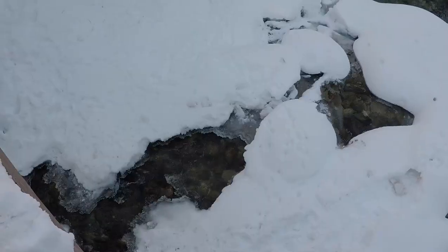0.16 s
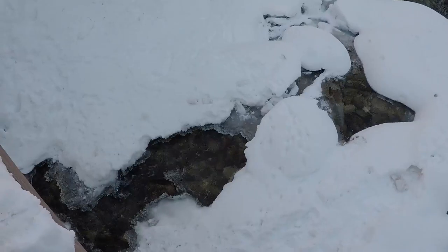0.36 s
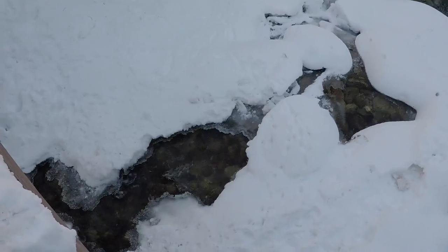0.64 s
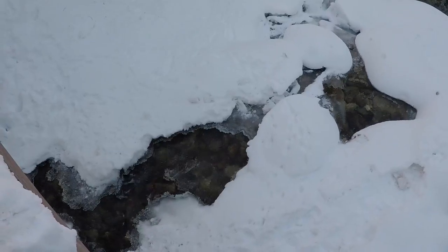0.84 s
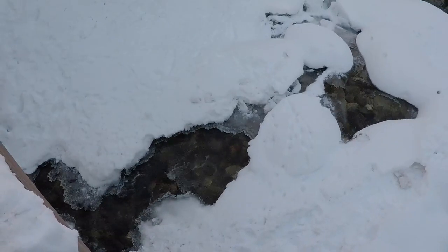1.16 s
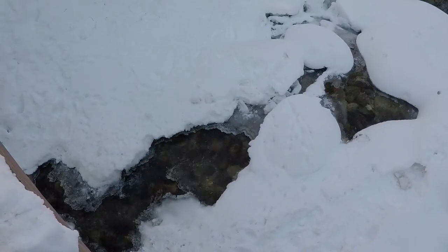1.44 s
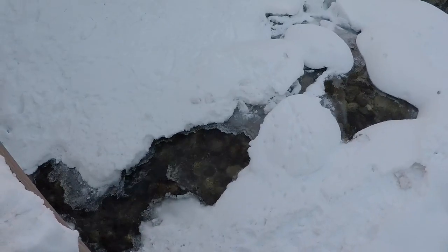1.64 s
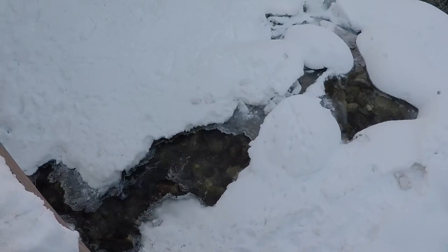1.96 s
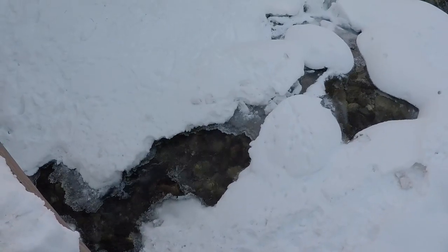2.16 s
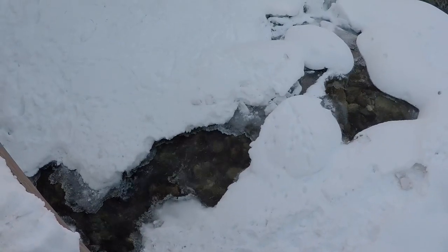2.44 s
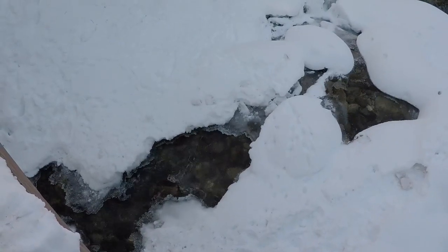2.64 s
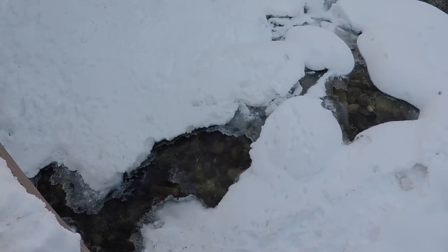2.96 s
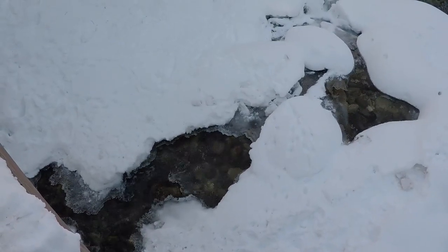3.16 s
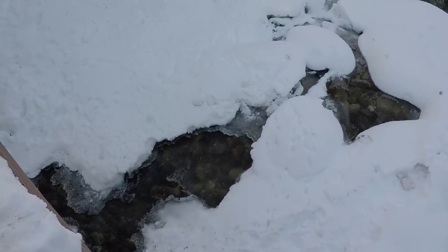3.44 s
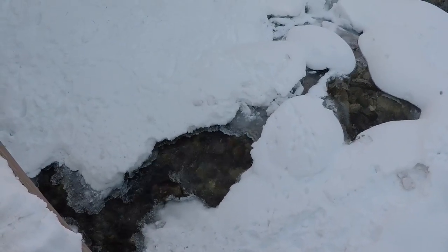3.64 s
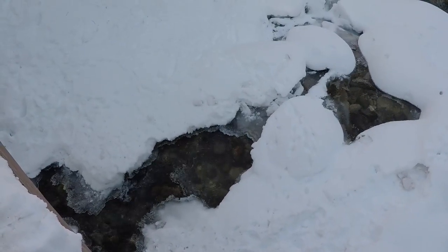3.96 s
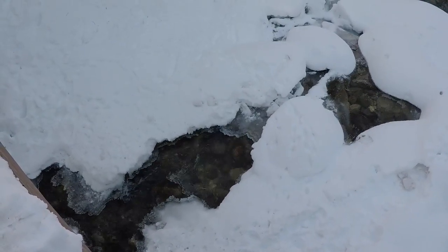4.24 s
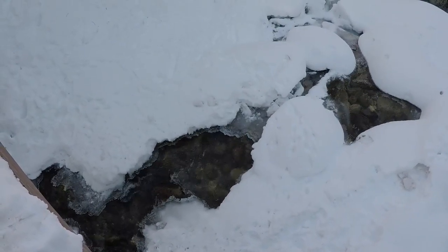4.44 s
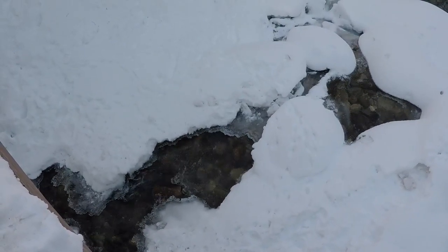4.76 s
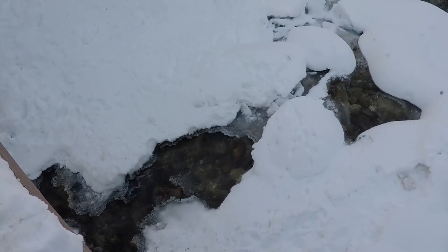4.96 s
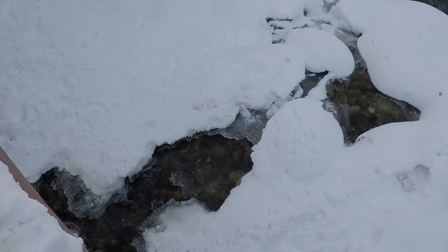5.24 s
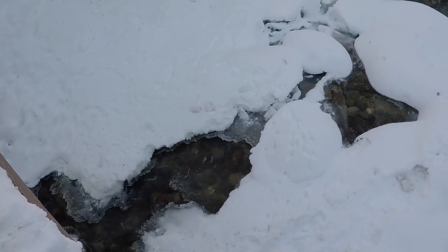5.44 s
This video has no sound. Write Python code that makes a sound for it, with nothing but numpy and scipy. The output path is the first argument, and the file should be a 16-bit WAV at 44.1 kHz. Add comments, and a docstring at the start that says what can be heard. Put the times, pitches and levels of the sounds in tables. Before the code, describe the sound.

Outdoors in snow, a small stream runs steadily past a nearby microphone: soft low rush, hollow gurgling, light babble and fine spray. Bright drops and tiny spits come irregularly, with deeper glugs just before four seconds and after five. A distant engine hums low throughout, sagging slightly in pitch, with faint wind rumble. Around five seconds something brushes briefly like a sleeve.

```python
"""The listener hears first the soft rush of a small river over rocks, between banks of snow and ice.
Over this patchy noise, damped sines make big air pockets gurgle and small bubbles babble; noise bursts spit.
In the distance an engine, a sum of harmonics, hums and slowly sags in speed; a draught rumbles and puffs.
Near the end something brushes briefly, like a sleeve: gritty high noise under a short envelope."""
import sys
import numpy as np
from scipy import signal
from scipy.fft import rfft, irfft, next_fast_len
from scipy.io import wavfile
from scipy.ndimage import uniform_filter1d, map_coordinates

SR = 44100
rng = np.random.default_rng(int(sys.argv[2]) if len(sys.argv) > 2 else 0)


def generate_wav(signal):
    """Clip the signal to [-1, 1] and save it as 16-bit WAV at the path in sys.argv[1]."""
    frames = np.transpose(np.atleast_2d(signal))
    scaled = np.clip(frames, -1, 1) * 32767
    pcm = np.round(scaled).astype(np.int16)
    wavfile.write(sys.argv[1], SR, pcm)


N = 247401  # length [samples]

# Air rumble spectrum: (frequency [Hz], relative density [dB])
RUMBLE_SPECTRUM = [(10, -36), (22, -4), (42, 5), (65, 7), (110, -13), (250, -50)]
# Puffs of air on the microphone: (time [s], level [dB])
AIR_PUFFS = [(.29, -46), (1.37, -49), (2.56, -50), (3.14, -48), (3.46, -49)]
# Swelling of the engine hum: (time [s], first order level before trim [dB], second order level [dB])
HUM_LEVELS = [(0.1, -40.0, -41), (0.4, -44.5, -39.5), (1.3, -39.5, -39.5), (1.52, -46.5, -41.0),
              (1.87, -35.5, -41.0), (2.3, -45.5, -41.5), (2.6, -42, -45.5), (2.9, -43.0, -41.5),
              (3.2, -50.5, -42), (3.9, -42, -43), (4.33, -52, -46.0), (4.6, -43.5, -43.5),
              (5.0, -48, -48.0), (5.25, -44, -42.5), (5.6, -48, -41)]
# Engine overtones: (multiple of the firing rate [1], level against the second order before edge [dB])
HUM_OVERTONES = [(3, -7), (4, -13), (5, -16.5), (6, -24)]
# Cloth noise spectrum: (frequency [Hz], relative density [dB])
CLOTH_SPECTRUM = [(1200, -40), (2200, -10), (3000, 2), (4000, -2.5), (4900, 2.5), (5900, -9), (6500, -3),
                  (7700, -13), (10000, -9), (11400, -9), (12300, -12), (15000, -12.5)]
# Spectra of the soft rush, deep gurgle, babble and spray: (frequency [Hz], relative density [dB])
RUSH_SPECTRUM = [(40, -18), (100, 2), (200, -2), (300, -1.5), (450, 0.5), (600, -7.5), (750, -11),
                 (900, -16.5), (1250, -17.5), (1650, -24.5), (3000, -23.5), (6000, -35.5), (10000, -43),
                 (15000, -44.5)]
GURGLE_SPECTRUM = [(130, -4.5), (200, -3), (250, -5), (290, 1.5), (360, -3), (460, 1), (600, -9.5),
                   (760, -10.5), (1000, -26.5)]
BABBLE_SPECTRUM = [(700, 0.5), (1250, 4.5), (1600, -3.5), (2100, -5.5), (2950, 0.5), (3400, -4.5),
                   (4150, -5), (4420, -27), (4700, -5.5), (5200, -12), (6500, -31)]
SPRAY_SPECTRUM = [(900, -8), (2000, -1.5), (2900, 5), (3400, -6), (4150, 1), (4420, -6), (4720, 2),
                  (5100, -9.5), (5400, -8), (6850, -13), (7650, -11.5), (9200, -20.5), (10400, -17),
                  (11000, -22), (15300, -23)]
# Splashes that spit above the rest: (time [s], level before envelope and crackle [dB])
SPIT_EVENTS = [(.382, -46), (.989, -49), (1.073, -47), (1.619, -42.5), (1.768, -44.5), (2.248, -45.5),
               (2.378, -42), (2.479, -46), (2.75, -47), (2.934, -44), (3.377, -45), (3.426, -43),
               (3.647, -43), (3.931, -53), (4.19, -43.5), (4.821, -49), (5.168, -43.5), (5.373, -43)]
# Large air pockets that gulp under the ice:
# (time [s], starting pitch [Hz], level before damping [dB], life [cycles])
GULP_EVENTS = [(.771, 556, -29.5, 2.8), (2.025, 730, -36, 5), (3.615, 281, -31, 3), (3.859, 695, -43, 3),
               (3.93, 422, -25, 2.3), (4.066, 450, -26.5, 3), (4.827, 390, -27, 3),
               (5.338, 267, -18.5, 1.2)]
# Single close bubbles and drops: (time [s], starting pitch [Hz], level before damping [dB])
PLIP_EVENTS = [(0.382, 10300, -47), (.717, 2870, -38), (.941, 9900, -49), (.989, 2960, -30.5),
               (1.013, 3260, -34), (1.149, 4660, -36.5), (1.18, 2470, -32), (1.213, 9700, -48),
               (1.62, 7000, -46), (2.256, 10200, -48), (2.296, 1040, -31.5), (2.4814, 4620, -35),
               (2.622, 4050, -38), (3.293, 4250, -37), (3.377, 7240, -45), (3.487, 2330, -37),
               (3.932, 2580, -34), (4.113, 1550, -36), (4.195, 2670, -37), (4.234, 7400, -38),
               (4.525, 2880, -38), (4.557, 4300, -36), (5.1652, 2910, -31), (5.3723, 2920, -37)]
# Swelling and easing of deep water and of spray, each on its own curve, before layer trims:
# (time [s], deep water level [dB], spray level [dB])
FLOW_LEVELS = [(.1, -42, -60), (.8, -42.5, -65), (1.55, -41.5, -60), (2.1, -42.5, -64), (2.45, -41, -63.5),
               (3.05, -43, -64), (3.6, -39, -65), (4.35, -43.5, -63.5), (5.2, -40.5, -60), (5.6, -43, -60)]

# Draught: starting level [dB], easing [dB/s]; puff: half width to 1/e [s]
DRAUGHT_DB, DRAUGHT_EASING_DB_PER_S, PUFF_S = -48, .5, 0.049
# Engine: starting firing rate [Hz], its sag [Hz/s]; overtones: lift at the start [dB], loss [dB/s]
FIRING_HZ, SAG_HZ_PER_S = 82.84, .42
EDGE_DB, DULLING_DB_PER_S = 1.05, .5
# Cloth: a short stroke inside a fainter, longer rustle; the rustle's half width is to 1/e
BRUSH_AT_S, BRUSH_DB = 4.98, -43.5
BRUSH_ATTACK_S, BRUSH_HOLD_S, BRUSH_RELEASE_S = 0.013, 0.063, 0.03
RUSTLE_DB, RUSTLE_S = -56, 0.16
SPIT_RISE_S, SPIT_FADE_S = 0.0016, 0.012
# Close bubbles: base life at the reference pitch [cycles], that pitch, exponent of growth with pitch
PLIP_CYCLES, PLIP_REF_HZ, CYCLES_GROW = 6.7, 3000, 0.8
# Babble: mean level [dB], wander [dB]; wander rate shared with the spray [knots/s]
BABBLE_DB, BABBLE_WANDER_DB, WANDER_RATE = -55, 0.9, 6.5
# Sound begins after START_S; TOP_HZ is the upper band limit
START_S, TOP_HZ = .052, 15300


def amp(db):
    """Logarithmic level: decibels to amplitude gain."""
    return 10 ** (np.asarray(db) / 20)


def unit(x):
    """Power normalisation: scale to rms 1."""
    return x / np.sqrt(np.mean(x ** 2) + 1e-20)


def along(points, hz):
    """Logarithmic frequency scale: interpolate (frequency, value) points along it."""
    f, v = np.transpose(points)
    return np.interp(np.log(hz + 1), np.log(f + 1), v)


def curves(rows):
    """Linear interpolation in time: one value per sample for each column after the first."""
    s, *columns = np.transpose(rows)
    return [np.interp(np.arange(N) / SR, s, column) for column in columns]


def wobble(rate):
    """Random modulation: a smooth curve through Gaussian knots, rate per second, repeating after 4096."""
    knots = rng.standard_normal(4096)
    return map_coordinates(knots, [np.arange(N) * rate / SR], mode="wrap")


def swell(centre, width):
    """Gaussian envelope: a bell-shaped rise and fall, peak 1."""
    return np.exp(-((np.arange(N) / SR - centre) / width) ** 2)


def filtered(x, response):
    """Linear filtering: multiply the spectrum of x by a response of frequency."""
    size = next_fast_len(N + 8192)
    hz = np.fft.rfftfreq(size, 1 / SR)
    return irfft(rfft(x, size) * response(hz), size)[:N]


def noise(spectrum, patchy_db):
    """Turbulent noise: coloured, of rms 1, with random gain in short time-frequency patches."""
    z = signal.stft(rng.standard_normal(N), nperseg=256)[2]
    field = uniform_filter1d(rng.standard_normal(z.shape), size=5, axis=0)
    field = uniform_filter1d(field, size=6, axis=1)
    patchy = signal.istft(z * amp(patchy_db * unit(field)), nperseg=256)[1][:N]
    return unit(filtered(patchy, lambda hz: amp(along(spectrum, hz))))


def ring(start, hz, gain, life, rise, size):
    """Bubble resonance: damped sines start softly and climb in pitch as they near the surface."""
    cycles = hz[:, None] * np.arange(size) / SR
    age = cycles / life[:, None]
    envelope = np.exp(-age) * (1 - np.exp(-2 * cycles))
    phase = 2 * np.pi * cycles * (1 + rise * np.minimum(age, 10) / 2)
    waves = gain[:, None] * envelope * np.sin(phase)
    at = (start * SR).astype(int)[:, None] + np.arange(size)
    return np.bincount(at.ravel(), waves.ravel(), N)[:N]


def bubbles(spectrum, life, rise, scatter_db, churn_db, count, size):
    """Superposition: a swarm of bubbles at rms 1; those born while the water churns are stronger."""
    when, place, strength, damping = rng.random((count, 4)).T
    low, high = spectrum[0][0], spectrum[-1][0]
    hz = low * (high / low) ** place
    scatter = scatter_db * np.minimum(-np.log(1 - strength), 4)
    db = along(spectrum, hz) + scatter + churn_db[(when * N).astype(int)]
    lives = life * 2 ** (2 * damping - 1)
    # small bubbles are brief and spread over more hertz, so the same density takes a higher peak
    return unit(ring(when * N / SR, hz, amp(db) * hz, lives, rise, size))


def air():
    """Wind-induced pressure noise: a light draught rumbles on the microphone, with a few soft puffs."""
    draught = amp(DRAUGHT_DB - DRAUGHT_EASING_DB_PER_S * np.arange(N) / SR)
    puffs = sum(amp(db) * swell(s, PUFF_S) for s, db in AIR_PUFFS)
    return (draught + puffs) * noise(RUMBLE_SPECTRUM, patchy_db=0.5)


def engine():
    """Harmonic series: a far exhaust slows and dulls; its lowest firing order throbs unevenly."""
    t = np.arange(N) / SR
    first_db, second_db = curves(HUM_LEVELS)
    edge_db = EDGE_DB - DULLING_DB_PER_S * t
    phase = 2 * np.pi * np.cumsum(FIRING_HZ - SAG_HZ_PER_S * t) / SR
    throb = 1 + 0.16 * wobble(18)
    hum = amp(first_db + 0.44) * throb * np.cos(phase + 0.32 * wobble(18))
    hum += amp(second_db) * np.cos(2 * phase + .04 * wobble(15))
    for order, db in HUM_OVERTONES:
        level_db = second_db + edge_db + db + 2.6 * wobble(3.1)
        hum += amp(level_db) * np.cos(order * phase + 0.092 * wobble(5.6))
    return -np.sqrt(2) * hum  # a steady cosine then has its level as rms


def sleeve():
    """Friction noise: a short swish of cloth, gritty where the fibres catch."""
    corners = BRUSH_AT_S + np.cumsum([0, BRUSH_ATTACK_S, BRUSH_HOLD_S, BRUSH_RELEASE_S])
    stroke = amp(BRUSH_DB) * np.interp(np.arange(N) / SR, corners, [0, 1, 1, 0])
    rustle = amp(RUSTLE_DB) * swell(corners.mean(), RUSTLE_S)
    grit = unit(amp(2.1 * wobble(4000)))
    envelope = np.hypot(stroke, rustle)  # powers add
    return envelope * amp(0.68 * wobble(300)) * grit * noise(CLOTH_SPECTRUM, patchy_db=2.5)


def spits():
    """Impact noise: a wavelet slaps a rock; crackling spray swells within milliseconds and dies away."""
    s, db = np.transpose(SPIT_EVENTS)
    age = np.maximum(np.arange(N) / SR - s[:, None], 0)
    envelopes = (1 - np.exp(-age / SPIT_RISE_S)) * np.exp(-age / SPIT_FADE_S)
    burst = amp(db) @ envelopes
    crackle = amp(2.1 * wobble(1200) - 1)
    return burst * crackle * noise(SPRAY_SPECTRUM, patchy_db=2.0)


def gulps():
    """Large-cavity resonance: trapped air lets go with a low, short glug."""
    s, hz, db, life = np.transpose(GULP_EVENTS)
    return ring(s, hz, amp(db), life, rise=0.033, size=3000)


def plips():
    """Resonance and scattering: close bubbles ring with a weaker twin, and the ice shelf scatters both."""
    s, hz, db = np.transpose(PLIP_EVENTS)
    # smaller bubbles ring for more cycles
    life = PLIP_CYCLES * (hz / PLIP_REF_HZ) ** CYCLES_GROW
    delay, detune = rng.random((len(s), 2)).T
    direct = ring(s, hz, amp(db), 0.62 * life, rise=.008, size=1500)
    twin_hz = hz * (0.91 + 0.24 * detune)
    direct += ring(s + 0.0031 * delay, twin_hz, amp(db - 1), 0.3 * life, rise=.008, size=1500)
    t = np.arange(1024) / SR
    ice = rng.standard_normal(len(t)) * amp(-60 * t / 0.034)  # falls 60 dB in 34 ms
    ice /= np.linalg.norm(ice)
    return direct + amp(-6) * signal.fftconvolve(direct, ice)[:N]


def splashes(fade, count):
    """Random impulse process: wavelets break on the rocks, swell quickly and die away; churn has rms 1."""
    when, strength = rng.random((count, 2)).T
    breaks = np.bincount((when * N).astype(int), strength ** 2, N)
    decaying = signal.lfilter([1], [1, -np.exp(-1 / (fade * SR))], breaks)
    churn = uniform_filter1d(decaying, size=90)
    return unit(churn - churn.mean())


def river():
    """Modulation: the deep current swells rush, gurgle and babble; spray and fizz rise and fall on
    their own curve; splashes stir all but the rush."""
    deep_db, spray_db = curves(FLOW_LEVELS)
    surge_db = deep_db - np.mean(deep_db)
    churn = splashes(fade=0.0088, count=1100)
    babble_db = BABBLE_DB + .4 * surge_db + BABBLE_WANDER_DB * wobble(WANDER_RATE)
    spray_db = spray_db + .5 * wobble(WANDER_RATE)
    rush = amp(.5 * surge_db - 42) * noise(RUSH_SPECTRUM, patchy_db=1.5)
    gurgle = amp(deep_db - 3.5) * bubbles(
        GURGLE_SPECTRUM, life=4.07, rise=0.029, scatter_db=2.0, churn_db=0.58 * churn, count=2400, size=2200)
    babble = amp(babble_db) * bubbles(
        BABBLE_SPECTRUM, life=4.5, rise=0.023, scatter_db=3, churn_db=1.75 * churn, count=8000, size=600)
    spray = amp(spray_db + 0.4) * bubbles(
        SPRAY_SPECTRUM, life=4.0, rise=0.0038, scatter_db=3.5, churn_db=2.0 * churn, count=16000, size=256)
    fizz = amp(spray_db + 5.5 + 1.52 * churn) * noise(SPRAY_SPECTRUM, patchy_db=1.2)
    return rush + gurgle + babble + spray + fizz


def scene():
    """Superposition: the pressures of all sources add at one microphone."""
    return (river() + spits() + plips() + gulps() + engine() + air() + sleeve())[None]


def record(dry):
    """Band limitation: a moment of silence, then the sum with nothing above the band limit."""
    running = np.arange(N) / SR > START_S
    return filtered(dry[0] * running, lambda hz: hz < TOP_HZ)[None]


dry = scene()
out = record(dry)
generate_wav(out)
```